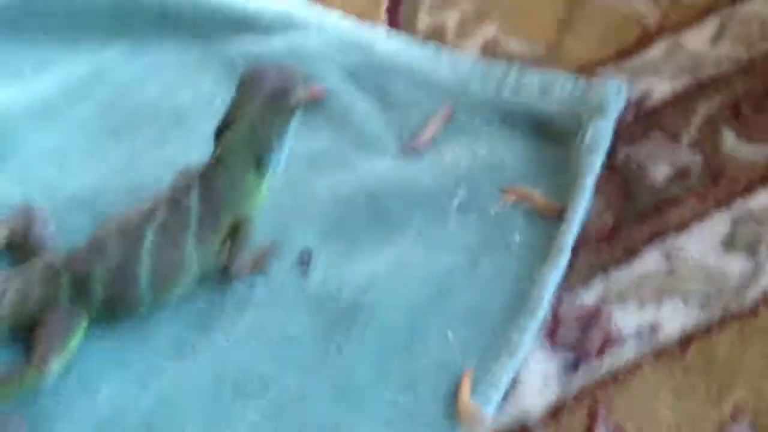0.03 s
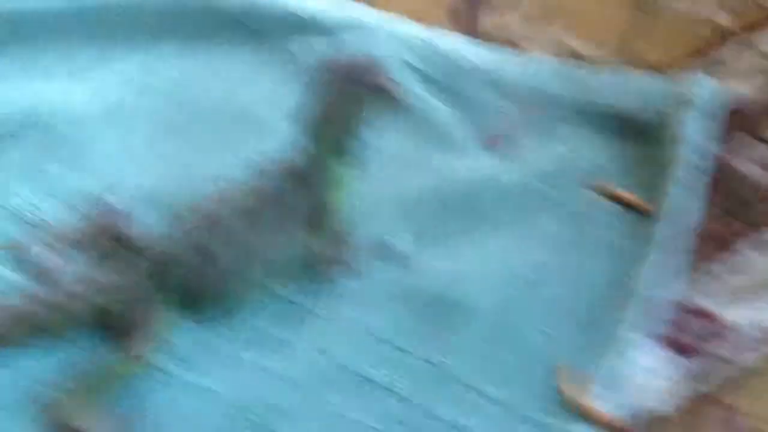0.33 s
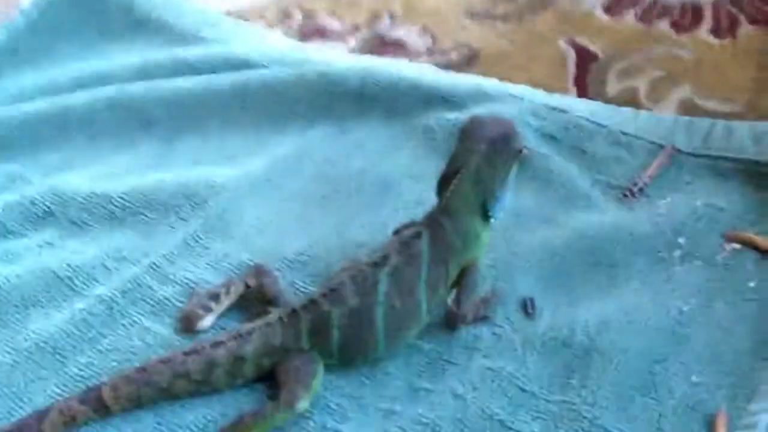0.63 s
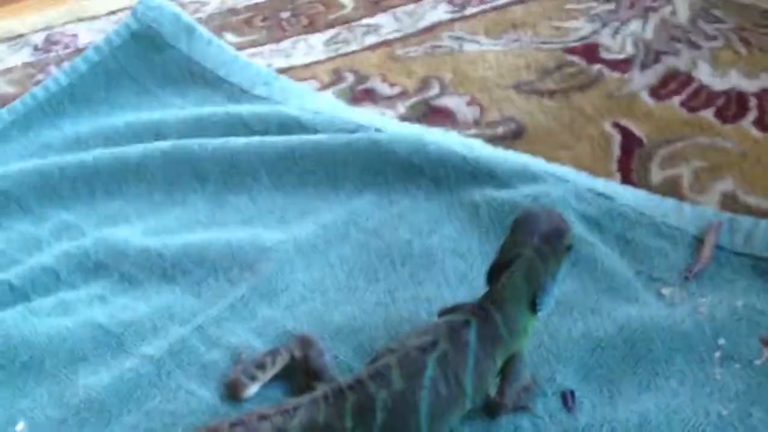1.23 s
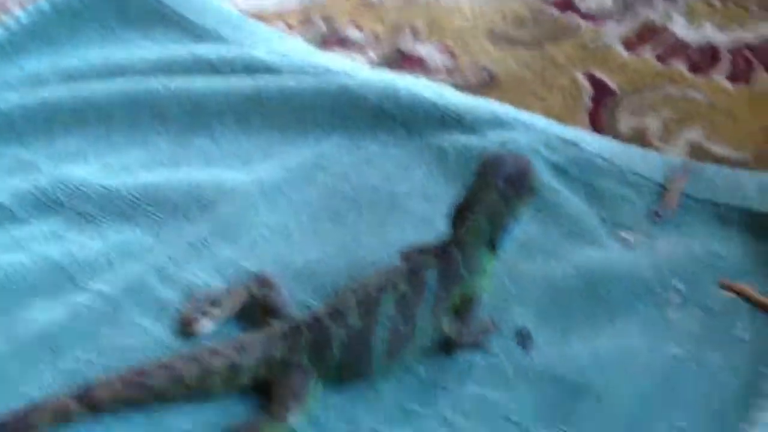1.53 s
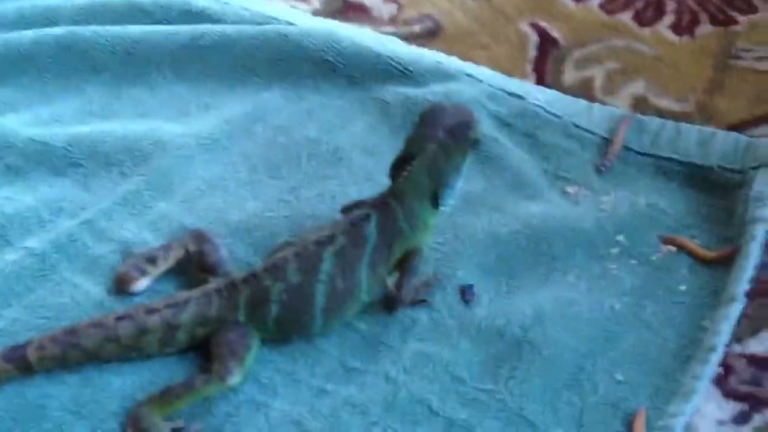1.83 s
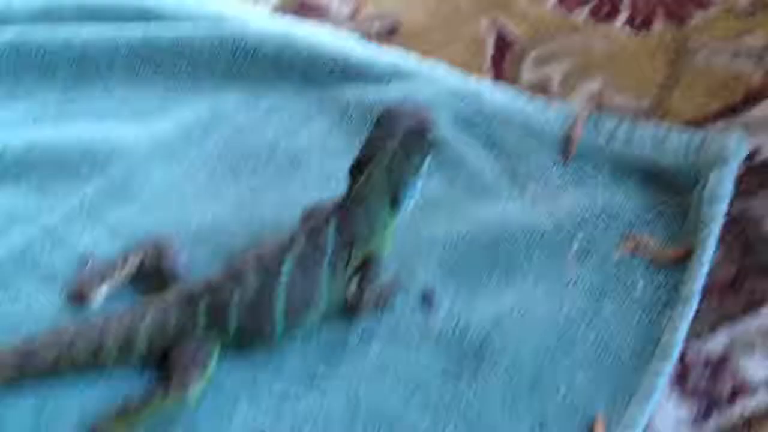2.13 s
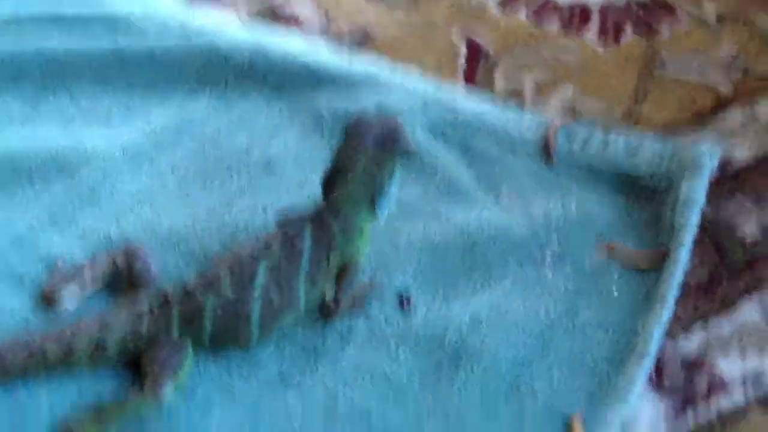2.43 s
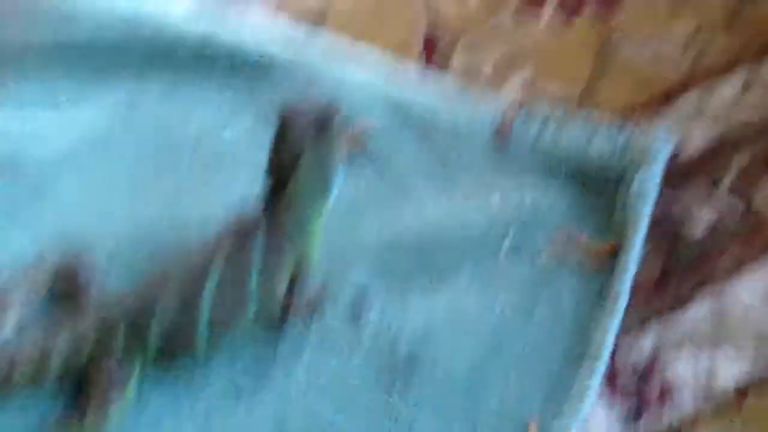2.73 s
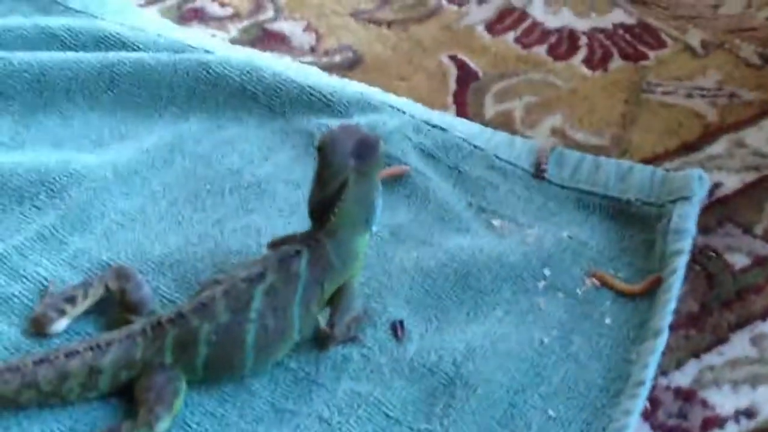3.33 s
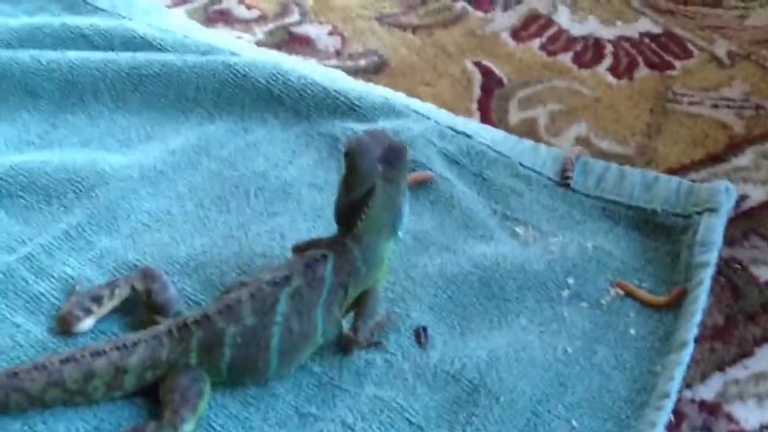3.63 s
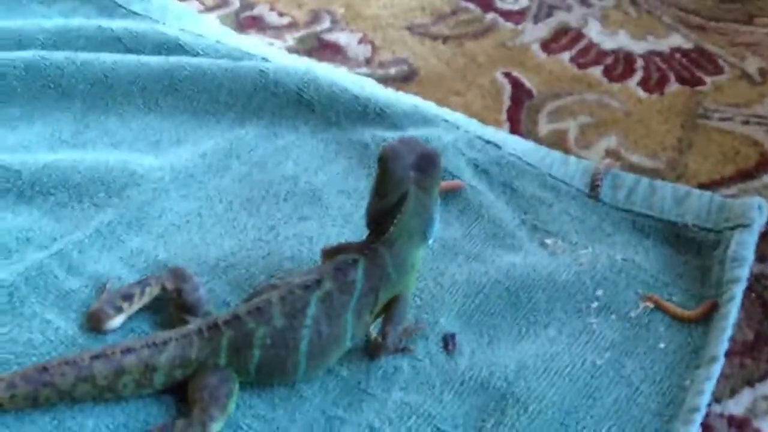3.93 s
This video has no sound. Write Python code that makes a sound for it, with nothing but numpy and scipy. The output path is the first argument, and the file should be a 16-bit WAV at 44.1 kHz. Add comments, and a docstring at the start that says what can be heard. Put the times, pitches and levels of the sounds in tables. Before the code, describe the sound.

Fingers handling a small camera make a quick burst of clicks and rustles, then near silence.

```python
"""Plastic snaps and skin rubs as fingers shift their grip on a small hand-held camera in a quiet room.
The snaps and the short hissing strokes both ring two resonances of the microphone port; the hand
bumps the case dully, and the hardest snaps overload the microphone.
Then only room hum, hiss and soft scuffs on cloth remain."""
import sys
import numpy as np
from scipy import signal
from scipy.fft import rfft, irfft
from scipy.io import wavfile

SR = 44100
rng = np.random.default_rng(int(sys.argv[2]) if len(sys.argv) > 2 else 0)


def store_pcm(level_fs):
    """Save levels as 16-bit WAV."""
    pcm = np.round(np.clip(level_fs, -1, 1) * 32767).astype(np.int16)
    wavfile.write(sys.argv[1], SR, np.atleast_2d(pcm).T)


N = 176400

# case snaps: t/s, knock gain/dB, knock corner/Hz, lower and upper port gain/dB, crack gain/dB,
# port tuning/ratio
CASE_SNAPS = [(0.0794, -19, 3000, -11, -7, -1.5, 1.6), (.1164, 10.5, 5000, 31, 30.5, 25, 0.99),
              (.1533, 16, 1200, 9, 13.5, 5.5, 1.07), (0.1628, -9, 1000, -4, 4, -14, 1.1),
              (0.1859, 6.5, 2400, 20.5, 21.5, 19.5, 1.01), (.2119, 5, 900, 0, 9, 0.5, 0.98),
              (.2730, -20.5, 3000, 6, 2, -2.5, 1.5), (.2840, -8.5, 2000, 0, 1, -13, 0.82),
              (0.3741, -15.5, 1600, -9, -2, -12, 0.87), (0.4097, -13, 1200, -16, -6, -19, 1.1),
              (.4257, 4.5, 3600, 18.5, 13, 19, 1.016), (0.4468, -23, 2500, -3, -2, -27, 1.0),
              (0.4843, -12, 1500, -12, -20, -18.5, 1.3), (.5091, 7, 4000, -1, 18, 13, 0.97),
              (0.5181, 10, 4500, 26, 21.5, 9, 1.04), (0.5998, -10.5, 3500, -8.5, -20, -30, 1.06),
              (0.634, -15.5, 1000, -19, -22, -32, 1.2)]
# skin strokes: t/s, length/s, rise/s, hiss level/dB, fade/(dB/s), port level/dB, rustle level/dB
SKIN_STROKES = [(0, .062, 0.0016, -41.5, -7, -52, -48.5), (0.057, 0.049, 0.021, -28.5, 60, -42, -51.5),
                (0.111, .044, 0.0046, -40.5, 36.5, -41, -44.5), (0.16, .022, 0.0048, -30.5, 83, -42, -50),
                (0.186, 0.029, 0.01, -27.5, 19.5, -37.5, -46), (0.235, .029, 0.026, -30.5, 200, -45, -59),
                (0.273, 0.011, 0.0011, -26, 150, -33.5, -55), (0.287, 0.033, .002, -47, 62, -56, -58),
                (0.318, 0.065, 0.026, -27.5, 280, -33.5, -54), (0.406, .017, 0.0013, -31, 250, -43.5, -53),
                (0.422, 0.047, 0.0017, -38.5, 387, -45, -47), (0.473, .016, .006, -53, 37.5, -61, -67),
                (0.595, 0.045, 0.011, -51.5, 13, -54, -66), (.642, 0.046, 0.038, -54, 10.5, -57.5, -72)]
# hand bumps: t/s, gain/dB
HAND_BUMPS = [(.006, 4), (.018, -1), (0.188, 13), (0.214, 9.5), (0.374, 5), (0.427, 10)]
# microphone port resonances: f/Hz, width/Hz
PORT_MODES = [(5420, 240), (6700, 270)]
# cloth scuffs: peak t/s, half length/s, level/dB
CLOTH_SCUFFS = [(1.972, 0.02, -60.5), (2.948, 0.0073, -55), (3.052, 0.062, -55)]
# room hum: f/Hz, level/dB
HUM_TONES = [(273, -67), (537, -78.5)]
# spectra: f/Hz, level/dB
CRACK_SPECTRUM = [(1000, -50), (4000, -5.5), (7700, -7.5), (9300, -1.5), (10400, 1), (11200, -5),
                  (12000, 2), (13000, -7), (14400, 1.5), (16000, -22.5)]
SKIN_SPECTRUM = [(1000, -40), (3000, -24), (4600, -26), (7800, -10.5), (9300, -8.5), (10300, 1),
                 (11800, -4.5), (13000, -3.5), (14400, 0), (16000, -7.5)]
RUSTLE_SPECTRUM = [(60, -19.5), (150, 5), (300, 4), (600, -7.5), (1300, -6.5), (2500, -10.5), (5000, -24.5),
                   (16000, -54.5)]
CLOTH_SPECTRUM = [(60, -24), (120, -16.5), (165, 3.5), (250, -6.5), (580, -6), (900, -13), (1400, -18),
                  (3000, -34), (16000, -46)]
ROOM_SPECTRUM = [(18, -87.5), (30, -54), (81, -42), (90, -21.5), (102, -6), (140, -12.5), (176, -4.5),
                 (241, -8), (268, -2), (339, -13.5), (428, -12), (500, -16.5), (541, -14.5), (601, -15.5),
                 (1310, -24), (14100, -26), (15200, -28)]

GRAIN_LOG_SPREAD, FLUTTER_DB, FLUTTER_HZ, RELEASE_S = .5, 3.5, 300, .003
BUMP_HZ, BUMP_WIDTH_HZ = 191, 164
ROOM_DB, ROOM_WAVER_DB, HUM_WIDTH_HZ = -60, 0.74, 9
LOW_CUT_HZ, TOP_HZ, OVERLOAD_FS = 146, 15500, 0.64


def snaps():
    """Each snap knocks the case, rings the port and cracks in the treble."""
    out, tap = np.zeros(N), signal.unit_impulse(4096)
    crack = colour(tap, CRACK_SPECTRUM)
    for start_s, knock_db, knock_hz, lower_db, upper_db, crack_db, tuning in CASE_SNAPS:
        knock = undb(knock_db) * cut(tap, knock_hz, "low", order=2)
        ring = sum(undb(db) * resonate(tap, hz * tuning, width_hz)
                   for (hz, width_hz), db in zip(PORT_MODES, (lower_db, upper_db)))
        add(out, start_s, knock + ring + undb(crack_db) * crack)
    return out


def rubbing():
    """Skin sticks and slips in dense uneven grains that hiss, ring the port and rustle in the case."""
    t = np.arange(N) / SR
    hiss_env, ring_env, rustle_env = np.zeros((3, N))
    for start_s, length_s, rise_s, hiss_db, fade_db_per_s, ring_db, rustle_db in SKIN_STROKES:
        age_s = t - start_s
        attack = np.clip(age_s / rise_s, 0, 1) ** 1.3
        fade = undb(-fade_db_per_s * np.clip(age_s - rise_s, 0, length_s))
        release = np.exp(-np.maximum(age_s - length_s, 0) / RELEASE_S)
        stroke = attack * fade * release
        hiss_env += undb(hiss_db) * stroke
        ring_env += undb(ring_db) * stroke
        rustle_env += undb(rustle_db) * stroke
    flutter = undb(FLUTTER_DB * walk(FLUTTER_HZ))

    def grains():
        return flutter * rng.standard_normal(N) * np.exp(GRAIN_LOG_SPREAD * rng.standard_normal(N))

    slips = grains()
    ring = unit(sum(resonate(slips, hz, width_hz) for hz, width_hz in PORT_MODES))
    hiss = unit(colour(grains(), SKIN_SPECTRUM))
    rustle = unit(colour(grains(), RUSTLE_SPECTRUM))
    return hiss_env * hiss + ring_env * ring + rustle_env * rustle


def bumps():
    """The hand bumps the case: a low, damped thud."""
    out = np.zeros(N)
    thud = resonate_twice(signal.unit_impulse(4096), BUMP_HZ, BUMP_WIDTH_HZ)
    for start_s, db in HAND_BUMPS:
        add(out, start_s, undb(db) * thud)
    return out


def scuffs():
    """Soft, dull brushes on cloth."""
    t = np.arange(N) / SR
    swell = sum(undb(db) * np.exp(-((t - peak_s) / half_s) ** 2) for peak_s, half_s, db in CLOTH_SCUFFS)
    friction = rng.standard_normal(N) * undb(2.5 * walk(rate_hz=90))
    return swell * unit(colour(friction, CLOTH_SPECTRUM))


def room():
    """Low room noise and microphone hiss, with a wavering hum."""
    air = unit(colour(rng.standard_normal(N), ROOM_SPECTRUM))
    air *= undb(ROOM_DB + ROOM_WAVER_DB * walk(rate_hz=6))
    hum = sum(undb(db) * unit(resonate_twice(rng.standard_normal(N), hz, HUM_WIDTH_HZ))
              for hz, db in HUM_TONES)
    return air + hum


def undb(db):
    return 10 ** (np.asarray(db) / 20)


def unit(x):
    """Scale to rms 1."""
    return x / np.sqrt(np.mean(x ** 2))


def colour(x, points):
    """Minimum-phase filter through (f/Hz, level/dB) points."""
    hz, db = np.array(points, float).T
    bins_hz = np.maximum(np.arange(N // 2 + 1) * SR / N, 1)
    gain = undb(np.interp(np.log(bins_hz), np.log(hz), db))
    cepstrum = irfft(np.log(gain), N)
    cepstrum[1:N // 2] *= 2
    response = irfft(np.exp(rfft(cepstrum[:N // 2], N)), N)[:4096]
    return signal.fftconvolve(x, response)[:len(x)]


def resonate(x, hz, width_hz):
    """One resonance, gain 1 at its centre."""
    return signal.lfilter(*signal.iirpeak(hz, hz / width_hz, fs=SR), x + 1e-18)


def resonate_twice(x, hz, width_hz):
    return resonate(resonate(x, hz, width_hz), hz, width_hz)


def cut(x, hz, kind, order):
    """Low-pass or high-pass."""
    return signal.sosfilt(signal.butter(order, min(hz, SR / 2 - 1), kind, fs=SR, output="sos"), x + 1e-18)


def walk(rate_hz):
    """Smooth random curve, rms 1."""
    return unit(np.interp(np.arange(N) / SR * rate_hz, np.arange(N), rng.standard_normal(N)))


def add(out, start_s, sound):
    """Mix a sound in at its time."""
    i = max(int(start_s * SR), 0)
    out[i:i + len(sound)] += sound[:N - i]


def scene():
    """Handling noise passes a steep low cut, which trails each knock with a falling thump."""
    handling = cut(snaps() + rubbing() + bumps(), LOW_CUT_HZ, "high", order=6)
    return (handling + scuffs() + room())[None]


def record(dry):
    """The microphone rounds the hardest snaps; the top is cut."""
    rounded = OVERLOAD_FS * np.tanh(dry / OVERLOAD_FS)
    top_cut = signal.ellip(8, rp=.2, rs=60, Wn=TOP_HZ, fs=SR, output="sos")
    return signal.sosfilt(top_cut, rounded)


dry = scene()
out = record(dry)
store_pcm(out)
```